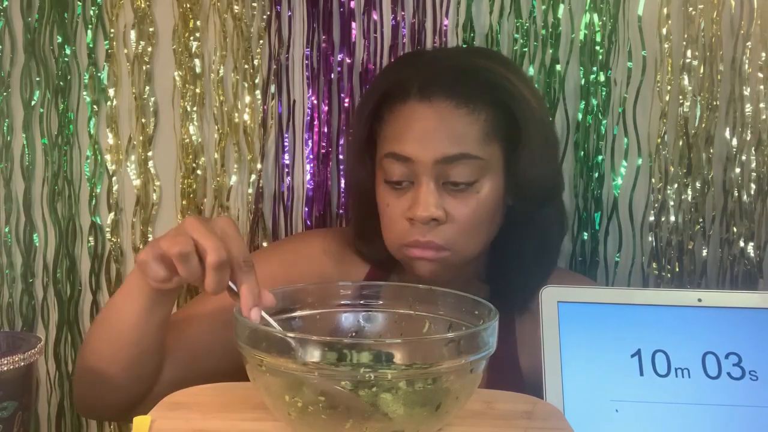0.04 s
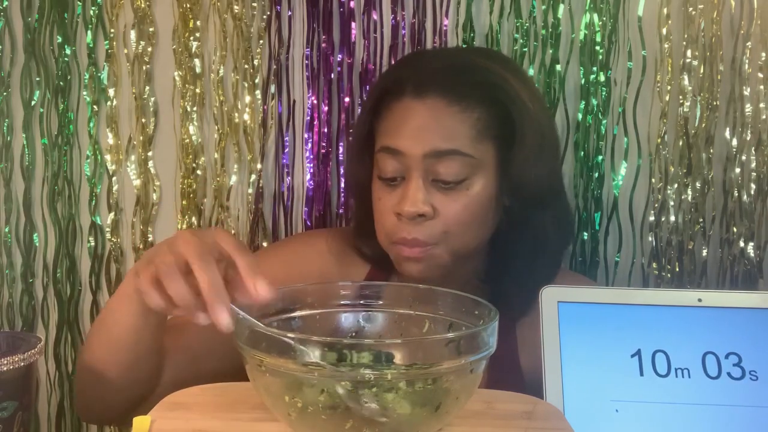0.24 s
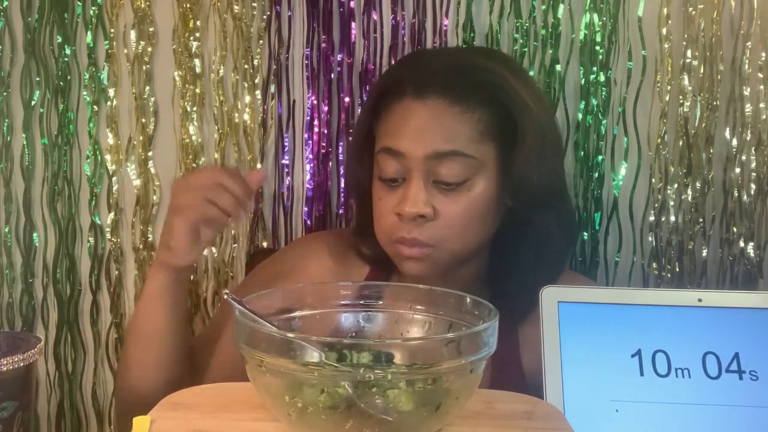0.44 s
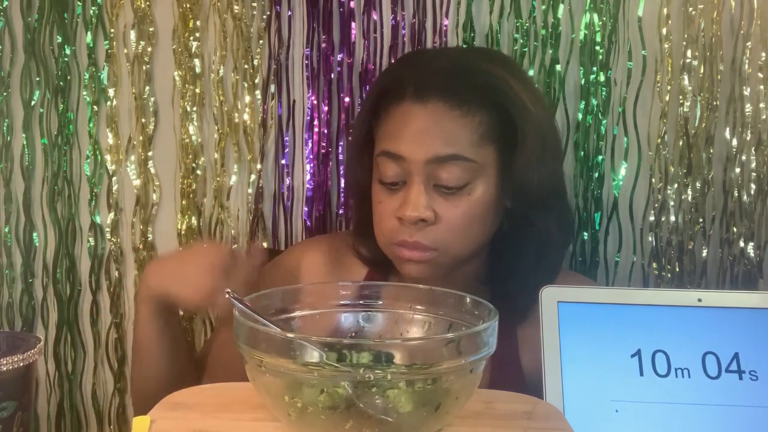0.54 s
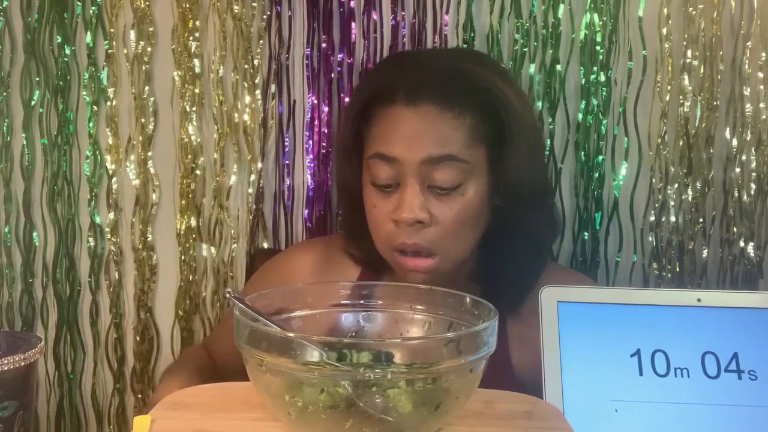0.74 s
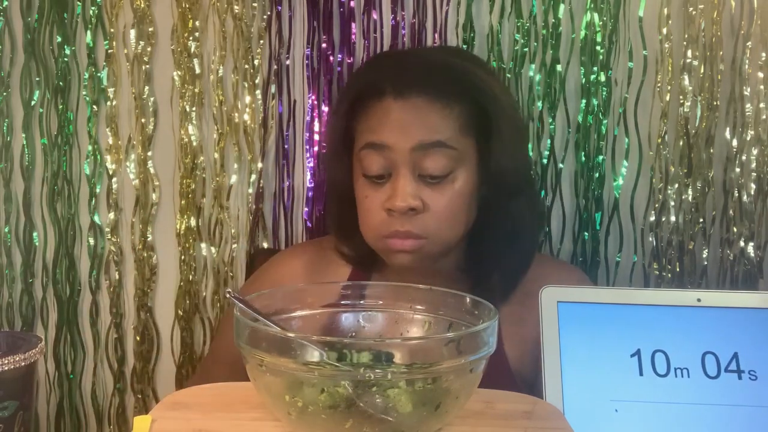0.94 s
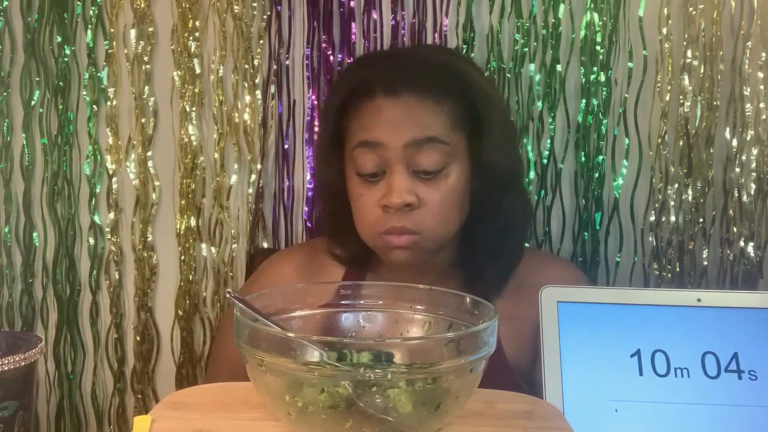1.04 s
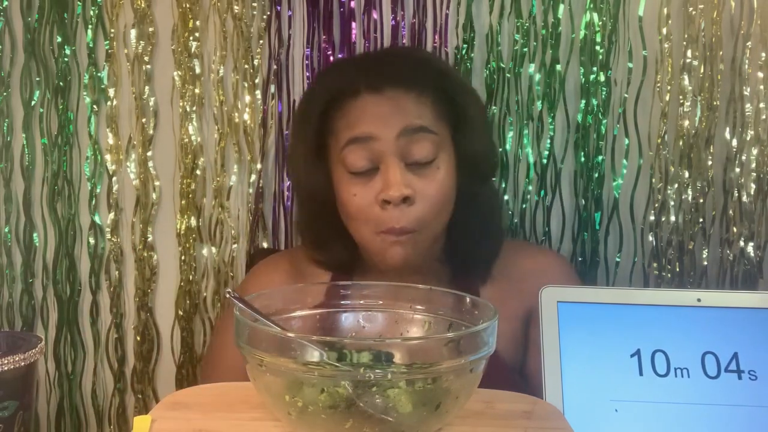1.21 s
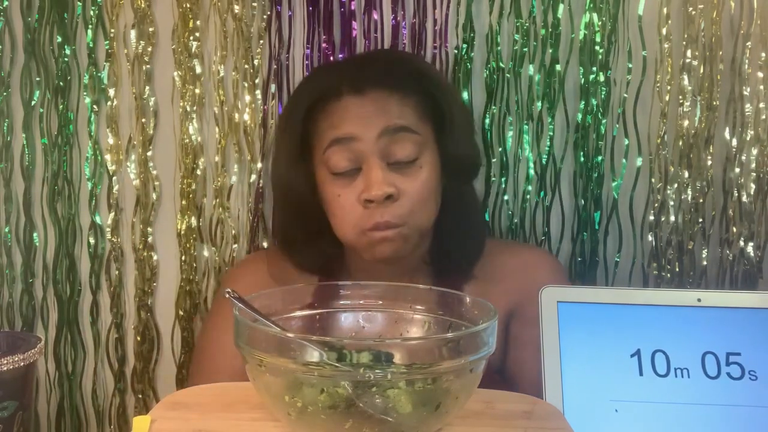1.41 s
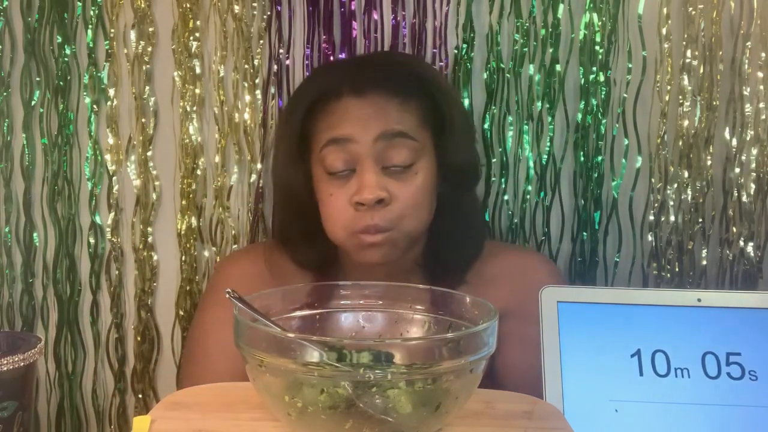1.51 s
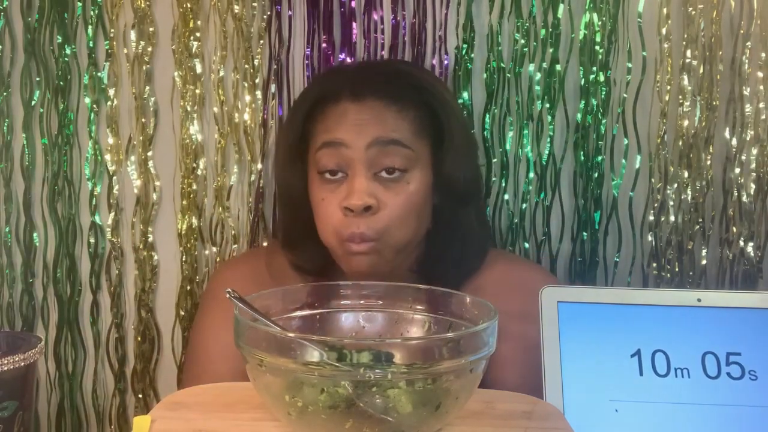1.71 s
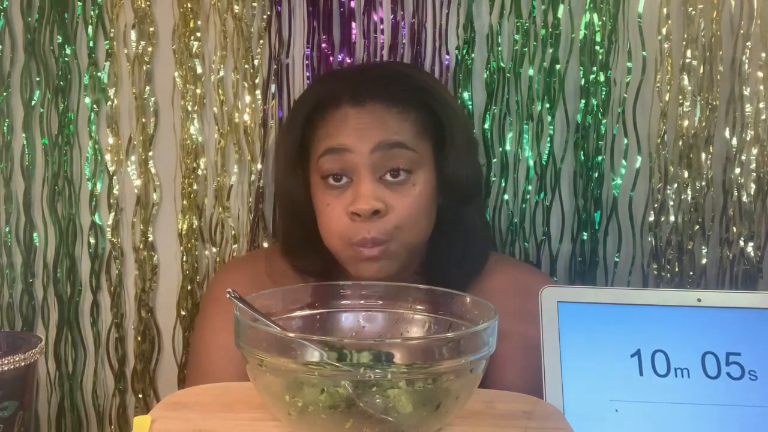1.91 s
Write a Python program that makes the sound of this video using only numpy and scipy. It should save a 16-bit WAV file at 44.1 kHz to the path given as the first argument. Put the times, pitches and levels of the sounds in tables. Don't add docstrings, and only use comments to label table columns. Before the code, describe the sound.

Bright glassy clinks as a steel spoon bounces to rest on a large glass bowl, indoors

```python
import sys
import numpy as np
from scipy import signal
from scipy.fft import rfft, irfft
from scipy.io import wavfile

SR = 44100
rng = np.random.default_rng(int(sys.argv[2]) if len(sys.argv) > 2 else 0)


def invert_db(level):
    return 10 ** (np.asarray(level, dtype=float) / 20)


def dump_mix(stems):
    frames = np.atleast_2d(stems).T
    limited = np.clip(frames, -1, 1)
    pcm = np.round(limited * 32767).astype(np.int16)
    wavfile.write(sys.argv[1], SR, pcm)


N = 85995

# (time [s], treble level [dB], hum level [dB], low ring level [dB], mid ring level [dB])
TOUCHES = [(0.2258, -22, -20.5, -36.0, -23.5), (0.2418, -22.5, -12.5, -19.5, -21),
           (0.2578, -26.5, -23.5, -31.5, -21.5), (0.2695, -27.5, -44, -28, -35),
           (0.2769, -34, -42, -21.5, -25.5), (0.3023, -31.5, -30.5, -30.5, -32),
           (0.3115, -21, -24.5, -22.5, -15), (0.3283, -13.5, -13.5, -24, -15),
           (0.3525, -16.5, -20.5, -22.5, -25.5), (0.3758, -19, -23, -20.5, -14.5),
           (0.3905, -17.5, -22, -22.5, -21.5), (0.3992, -14.5, -41.5, -17, -18),
           (0.411, -18, -29.5, -19.5, -19), (0.4218, -14.5, -22.5, -18.5, -38),
           (0.436, -20.0, -28.5, -32, -31), (0.4425, -24, -22, -19, -35.5),
           (0.4525, -24.0, -27, -27.5, -27), (0.47, -26, -32, -30.5, -33), (0.487, -28.5, -37, -46, -31),
           (0.4935, -34, -27.5, -61, -37.5), (0.5104, -40, -35, -67, -42), (0.5474, -42, -35.5, -47, -47),
           (0.6064, -51.5, -69, -81, -56), (0.678, -58, -55, -61, -56)]
# (crack level [dB], board level [dB],
# second glass mode level [dB], third glass mode level [dB], sixth glass mode level [dB])
LANDINGS = [(-39, -26.5, -33, -34, -24.5), (-39, -30.5, -37, -28, -15), (-35.5, -28, -34.5, -30.5, -26.5),
            (-69, -50, -41, -35.5, -24), (-24.5, -49.5, -42.5, -23.5, -23), (-32.5, -32, -42, -34.5, -22.5),
            (-39, -52, -31.5, -44.5, -26), (-24.5, -24, -30.5, -29.5, -22), (-44.5, -46, -27, -32.5, -15),
            (-41.5, -32, -42, -29, -30.5), (-40, -33.5, -52.5, -36, -16.5), (-31, -27.5, -49, -20, -16.5),
            (-49, -33, -58.5, -26, -19.5), (-27.5, -41, -32.5, -34, -24.5), (-51, -42, -30.5, -33.5, -29),
            (-43, -40.5, -34.5, -29, -33.5), (-39, -44, -41.5, -32, -26.5), (-36.5, -50, -65.5, -28, -24.5),
            (-41.5, -60, -49.5, -61, -28), (-58, -64.5, -49, -45, -38), (-47, -57, -47.5, -45.5, -48),
            (-50, -55, -51, -66, -52), (-61, -64, -57, -66, -61), (-57.5, -78, -81, -80, -60)]
BOWL_HZ = [438, 1109, 2003, 3090, 4310, 5665, 7130, 8730, 10430, 12260]

TOUCH_S, TREBLE_DB, HUM_DB, LOW_DB, MID_DB = np.transpose(TOUCHES)
CRACK_DB, BOARD_DB, SECOND_DB, THIRD_DB, SIXTH_DB = np.transpose(LANDINGS)
TOUCH_AT = (TOUCH_S * SR).astype(int)
RING_KEPT = 0.32
SCATTER_DB, HUM_SCATTER_DB = 1.2, 0.3


def time_s():
    return np.arange(N) / SR


def rms_one(x):
    return x / np.sqrt(np.mean(x ** 2) + 1e-20)


def decay(t60):
    return invert_db(-60 / (t60 * SR))


def coloured(spectrum, patchy_db):
    hz, db = np.transpose(spectrum)
    f = np.fft.rfftfreq(N, 1 / SR) + 1
    tilt_db = np.interp(np.log(f), np.log(hz), db, left=-90, right=-90)
    whole = rfft(rng.standard_normal(N)) * invert_db(tilt_db)
    out = 0
    for centre in np.arange(4, 15, 0.5):
        band = np.clip(1 - 2 * abs(np.log2(f) - centre), 0, 1)
        flicker = np.interp(time_s(), np.arange(60) / 25, rng.standard_normal(60))
        out = out + invert_db(patchy_db * flicker) * irfft(whole * band, N)
    return rms_one(out)


def resonance(x, hz, width):
    r = np.exp(-np.pi * width / SR)
    poles = [1, -2 * r * np.cos(2 * np.pi * hz / SR), r * r]
    return signal.lfilter([(1 - r * r) / 2, 0, (r * r - 1) / 2], poles, x)


def background():
    # (pitch [Hz], level [dB per Hz])
    tone_spectrum = [(12, -20.5), (20, 4.5), (216, -6.5), (422, -6), (574, -5), (698, -8.5), (897, -10.5),
                     (1150, -12.5), (16000, -31.5)]
    # (time [s], level [dB])
    rustle = [(0, -74), (.7, -64), (0.801, -64), (.92, -60), (1.22, -63.5), (1.31, -71.5), (1.39, -60.5),
              (1.5, -60.5), (1.62, -64), (1.702, -59), (1.792, -72), (1.95, -64.5)]
    # (pitch [Hz], level [dB per Hz])
    cloth = [(1470, -37), (2500, -24.5), (4320, -5.5), (4780, -2), (6360, 4.5), (11700, 1), (15800, -10.5)]
    tone_db, follows, mains_hz, mains_db = -60.5, 0.33, 117.7, -63.5
    rustle_db = np.interp(time_s(), *np.transpose(rustle))
    tone_now_db = tone_db + follows * (rustle_db - rustle_db.min())
    tone = invert_db(tone_now_db) * coloured(tone_spectrum, patchy_db=1)
    mains = invert_db(mains_db) * np.sin(2 * np.pi * mains_hz * time_s())
    return tone + invert_db(rustle_db) * coloured(cloth, patchy_db=1.0) + mains


def earlier_tap():
    rings_hz = [190, 2240, 2940, 4450, 4560, 6670, 7080, 8010, 9860, 10720, 11200, 13100, 6250, 8460, 12600]
    # (level [dB], t60 [s])
    leftovers = [(-45.5, 0.24), (-63.5, 0.1), (-58, 0.37), (-52.5, 0.45), (-54, 0.23), (-60, 0.48),
                 (-54, 0.34), (-51.5, 0.35), (-62, 0.18), (-46.5, 0.29), (-55, 0.15), (-60, 0.14),
                 (-68, .25), (-59.5, 0.22), (-51, 0.17)]
    # (pitch [Hz], level [dB per Hz])
    haze_spectrum = [(180, -29), (300, 5), (1520, -7.5), (2860, 0), (3490, -13), (4550, -13), (9290, -11),
                     (11000, -6), (15800, -28)]
    haze_db, haze_t60_s = -49, 0.32
    blur = 0.015
    t = time_s()
    out = invert_db(haze_db - 60 * t / haze_t60_s) * coloured(haze_spectrum, patchy_db=5.5)
    for hz, (db, t60) in zip(rings_hz, leftovers):
        ring = resonance(rng.standard_normal(2 * N), hz, 10 + blur * hz)[N:]
        out = out + invert_db(db - 2 - 60 * t / t60) * rms_one(ring)
    return out


def sparse_clicks():
    return rms_one((rng.random(N) < 3500 / SR) * rng.standard_normal(N) + 1e-12)


def wet_body(clicks, peaks):
    out = 0
    for hz, width, peak_db in peaks:
        ring = resonance(resonance(clicks, hz, width), hz, 3.8 * width)
        out = out + invert_db(peak_db - 10) * ring * np.sqrt(SR / np.pi / width)
    return out


def crackles():
    # (centre [s], half length [s], level [dB])
    clumps = [
        (0.076, 0.004, -50),
        (.748, 0.0075, -53.5),
        (.760, 0.011, -49.5),
        (.772, 0.005, -56),
    ]
    # (pitch [Hz], width [Hz], level [dB])
    peaks = [(483, 410, 6.5), (1730, 240, 5), (2270, 320, 6), (2850, 260, -2), (6800, 380, -1.5)]
    gate = sum(invert_db(db) * np.exp(-((time_s() - s) / half) ** 4) for s, half, db in clumps)
    return wet_body(gate * sparse_clicks(), peaks)


def struck(hz, t60, levels_db, keep, scatter_db, phases=None):
    contact_s, soft_cycles = 0.00035, 0.9
    twist, waver = 1.1, 0.002
    chance = rng.standard_normal((len(TOUCH_AT), 3))
    rough = scatter_db / SCATTER_DB
    pitch = hz * (1 + waver * min(rough, 1) * chance[:, 2])
    in_step = phases is None
    angle = twist * rough * chance[:, 1] if in_step else phases
    push = invert_db(levels_db + scatter_db * chance[:, 0]) * np.exp(1j * angle)
    out, state = np.zeros(N), 0
    for start, end, p, f in zip(TOUCH_AT, list(TOUCH_AT[1:]) + [N], push, pitch):
        n = np.arange(min(end, start + SR // 2) - start + 1)
        rise = 1 - np.exp(-n / ((contact_s + soft_cycles / f) * SR))
        if in_step:
            p = p * np.exp(1j * np.angle(state))
        kept = state * (1 - (1 - np.clip(keep, 0, 1)) * rise)
        wave = (kept + p * rise) * np.exp((np.log(decay(t60)) + 2j * np.pi * f / SR) * n)
        out[start:start + len(n) - 1] = wave[:-1].imag
        state = wave[-1]
    return out


def range_db(hz):
    if hz >= 6500:
        return TREBLE_DB
    nearest = np.argmin(abs(np.log(hz / np.array(BOWL_HZ))))
    return (HUM_DB, SECOND_DB, THIRD_DB, LOW_DB, MID_DB, SIXTH_DB)[nearest]


def bowl():
    # (level in its range [dB], t60 [s], split [Hz], upper partner level [dB])
    modes = [(-2.5, 1, 4.6, -18.5), (-1.5, 0.61, 5, -19), (-3, 0.6, 13, -10), (-1.5, 0.73, 34, -12),
             (-3, 0.36, 83, -0.5), (-3.5, 0.32, 34, -11), (-9, 0.16, 220, -7.5), (-9, 0.33, 48, -9),
             (-13.5, 0.092, 110, -2), (-14.5, 0.027, 41, -4.5)]
    # (time [s], pitch [Hz])
    hum_pitch = [
        (0.23, 421),
        (0.248, 424),
        (0.286, 460),
        (0.32, 433.8),
        (0.622, 443.1),
        (0.652, 428),
        (0.7, 424),
    ]
    low_hz, mid_hz = 1500, 3500
    hum_kept, middle_db = 0.15, -6.5
    hum_hz = np.interp(TOUCH_S + 0.0035, *np.transpose(hum_pitch))
    out = 0
    for hz, (db, t60, split, upper_db) in zip(BOWL_HZ, modes):
        low = hz < low_hz
        if low:
            grip = (hum_kept, HUM_SCATTER_DB)
        else:
            grip = (RING_KEPT, SCATTER_DB, rng.uniform(0, 2 * np.pi, len(TOUCHES)))
        centre_hz = hum_hz if hz == BOWL_HZ[0] else hz
        partners = ((-1.01, 0), (0.97, upper_db), (0.0046, middle_db))
        for side, side_db in partners[:2 if hz < mid_hz else 3]:
            pitch = centre_hz + (side + low) * split / 2
            out = out + struck(pitch, t60, range_db(hz) + db + side_db, *grip)
    return out


def spoon():
    steel_hz = [3775, 6153, 7357, 7811, 8050, 8470, 9868, 11150, 11500, 12660, 13200, 14220, 14790, 15500]
    # (level in its range [dB], t60 [s])
    modes = [(-18, 0.17), (-18.5, 0.2), (-11, 0.15), (-15.5, 0.19), (-21.5, 0.17), (-30, 0.28), (-23, 0.16),
             (-13, 0.2), (-13.5, 0.18), (-21.5, 0.26), (-20.5, 0.15), (-21, 0.12), (-20.5, .12), (-21, 0.2)]
    steel_db = -1.5
    spread = 0.012
    out = 0
    for hz, (db, t60) in zip(steel_hz, modes):
        for k in (-1, 0, 1):
            pitch = hz * (1 + spread * k * rng.uniform(0.405, 1))
            level_db = range_db(hz) + db + steel_db - 3 * abs(k)
            out = out + struck(pitch, t60, level_db, RING_KEPT, 2.715 * SCATTER_DB)
    return out


def board():
    # (pitch [Hz], level to board thud [dB], t60 [s])
    modes = [(103.7, -2, 0.053), (127.7, -7.5, 0.2), (193.1, 0.5, 0.13), (255.7, -9.5, 0.095)]
    return sum(struck(hz, t60, BOARD_DB + db, RING_KEPT, HUM_SCATTER_DB) for hz, db, t60 in modes)


def dying_noise_level(levels_db, t60):
    hits = np.full(N, 1e-12)
    hits[TOUCH_AT] = invert_db(2 * levels_db)
    return np.sqrt(signal.lfilter([1], [1, -decay(t60) ** 2], hits))


def clatter():
    # (pitch [Hz], level [dB per Hz])
    spectrum = [(90, -24.5), (300, -11), (1150, -13), (1550, -31.5), (2300, -14), (7500, -14),
                (11500, -16.5), (14000, -24), (16000, -22)]
    crack = invert_db(4.5) * dying_noise_level(CRACK_DB, 0.014)
    haze = invert_db(-10.5) * dying_noise_level(TREBLE_DB, 0.11)
    return (crack + haze) * coloured(spectrum, patchy_db=3.5)


def knock():
    knock_db, knock_hz, t60_s = -4, 730, 0.025
    hits = np.full(N, 1e-18)
    hits[TOUCH_AT] = invert_db(CRACK_DB + knock_db)
    puff = signal.lfilter([1], [1, -decay(t60_s)], hits) * rng.standard_normal(N)
    return 6 * resonance(resonance(puff, knock_hz, 700), knock_hz, 900)


def room(x):
    wet_db, t60_s, walls_hz = -10.5, 0.25, [900, 9270]
    t = time_s()[:SR // 2]
    tail = rng.standard_normal(len(t)) * invert_db(-60 * t / t60_s) * (t > 0.003)
    tail = signal.sosfilt(signal.butter(1, walls_hz, "band", fs=SR, output="sos"), tail)
    return invert_db(wet_db) * signal.fftconvolve(x, tail / np.sqrt(np.sum(tail ** 2)))[:N]


def creak():
    # (start [s], fade [s], level [dB])
    slips = [
        (1.8842, 0.002, -57),
        (1.8928, 0.004, -47.5),
        (1.9022, 0.003, -54),
        (1.9078, 0.006, -52),
        (1.9192, 0.004, -50),
        (1.927, 0.006, -59),
    ]
    # (pitch [Hz], width [Hz], level [dB])
    peaks = [(520, 225, 2), (2450, 100, -4), (3170, 220, 4), (4000, 220, -1), (4980, 200, 4),
             (10700, 2200, -9), (15000, 1200, -3)]
    t = time_s()
    gate = sum(invert_db(db) * (t > s) * np.exp(-abs(t - s) / fade) for s, fade, db in slips)
    clicks = sparse_clicks()
    clicks[(np.array(slips)[:, 0] * SR).astype(int) + 2] += 9
    return wet_body(gate * clicks, peaks)


def scene():
    clink = bowl() + spoon() + board() + clatter() + knock()
    return (background() + earlier_tap() + crackles() + clink + room(clink) + creak())[None]


def top_cut(x):
    return signal.sosfilt(signal.butter(12, 16290, fs=SR, output="sos"), x)


def record(dry):
    bass_cut_hz, top_cut_hz = 35, 16350
    thin = signal.sosfilt(signal.butter(1, bass_cut_hz, "high", fs=SR, output="sos"), dry)
    mix = signal.sosfilt(signal.cheby2(16, 60, top_cut_hz, fs=SR, output="sos"), thin)
    return top_cut(mix)


dry = scene()
out = record(dry)
dump_mix(out)
```